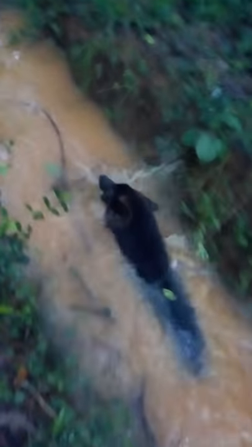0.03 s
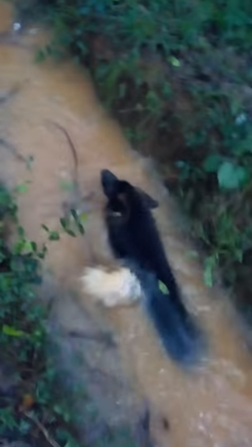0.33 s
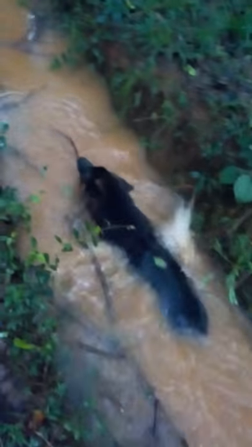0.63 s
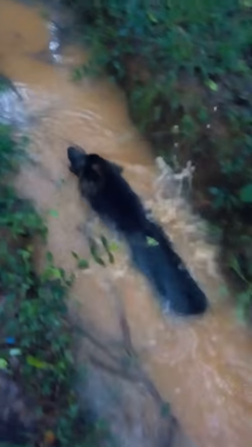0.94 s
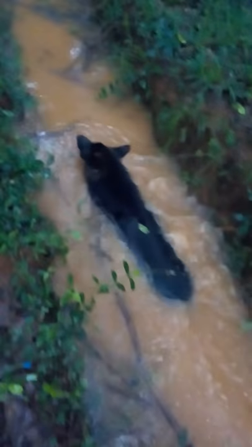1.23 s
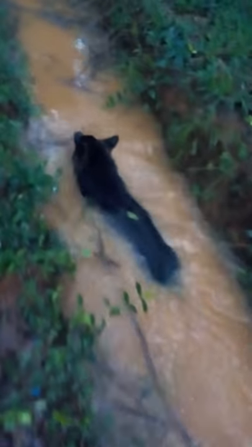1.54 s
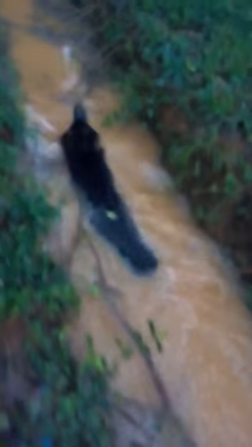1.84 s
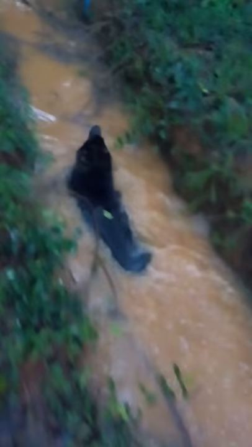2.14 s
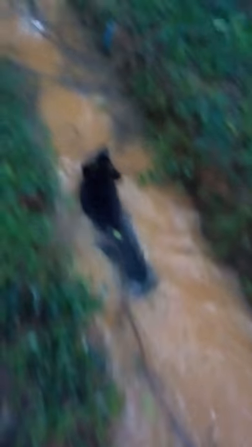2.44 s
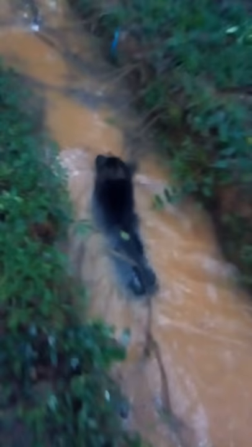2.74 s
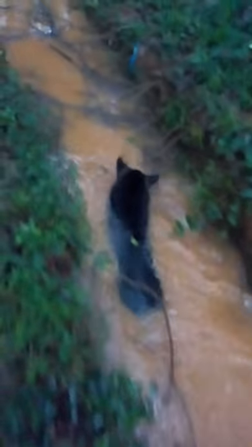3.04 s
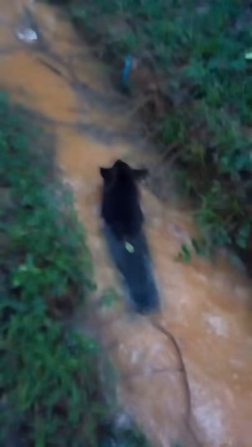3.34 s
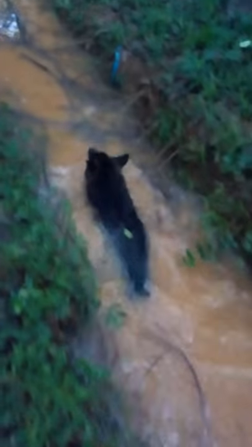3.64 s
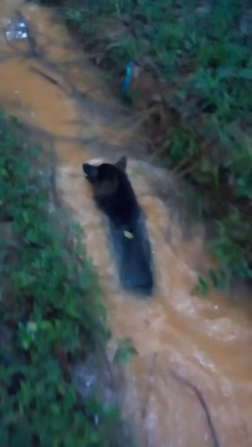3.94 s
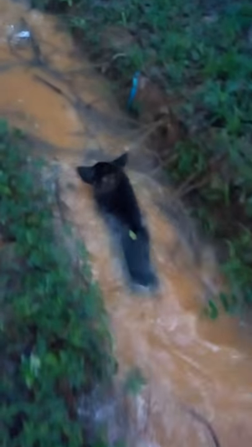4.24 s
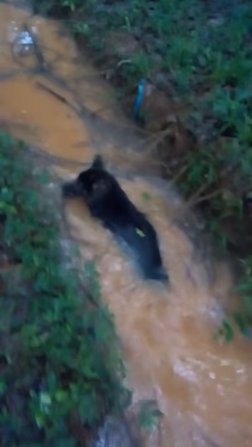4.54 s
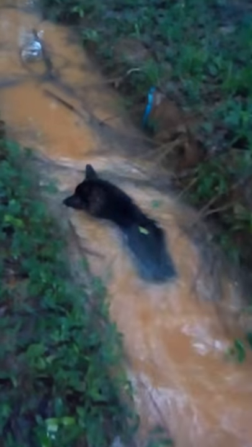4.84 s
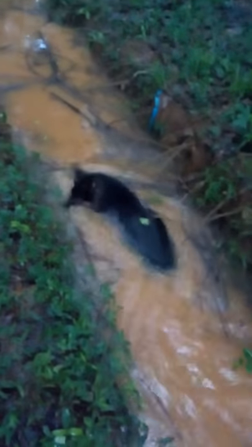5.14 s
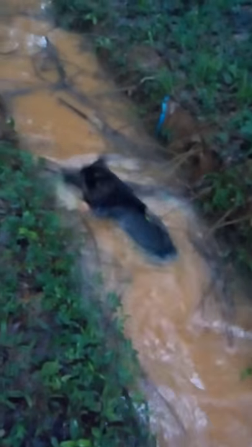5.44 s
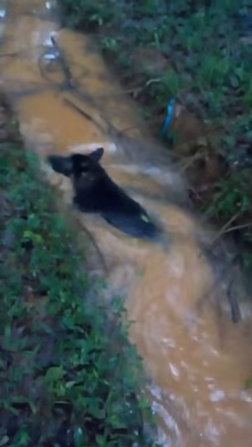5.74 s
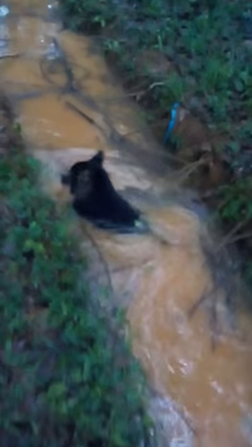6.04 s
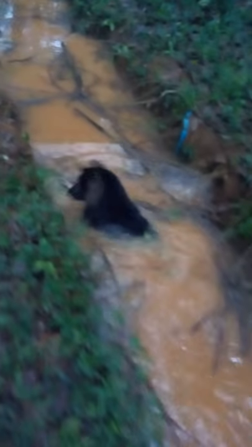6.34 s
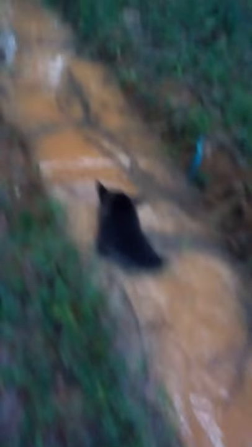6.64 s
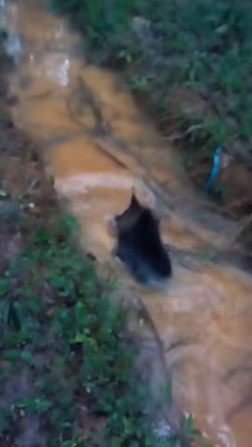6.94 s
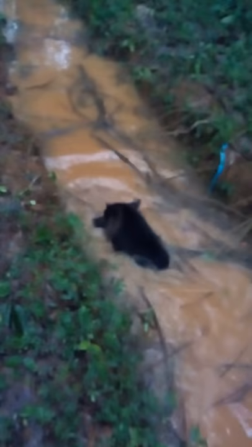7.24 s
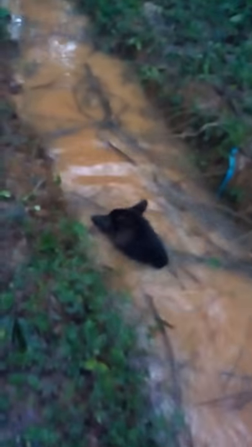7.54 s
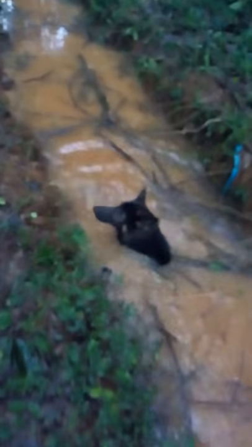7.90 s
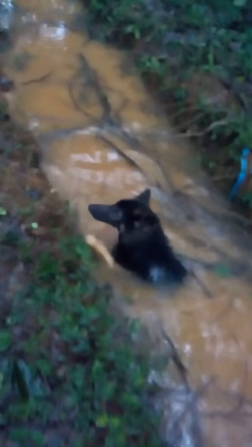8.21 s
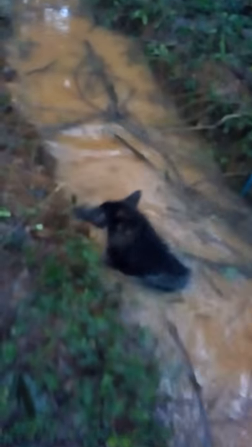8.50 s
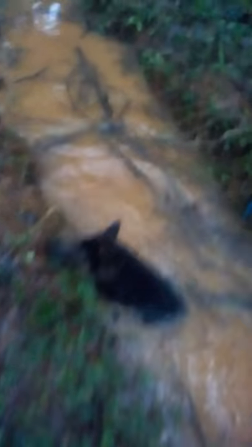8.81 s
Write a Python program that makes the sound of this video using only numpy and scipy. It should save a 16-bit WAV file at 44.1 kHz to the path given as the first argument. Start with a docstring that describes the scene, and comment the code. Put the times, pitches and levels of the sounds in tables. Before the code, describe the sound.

A dog wades up a shallow stream, its legs splashing, plopping and gurgling over the steady rush of the current.

```python
"""A muddy stream, heard from the bank on a hand-held phone: a dog wades and paddles up it.
Over the steady rush of the current its legs throw splashes and drops and drag air under,
which rings as bubbles and closes in sharp plops. The left microphone port is covered:
it booms near 440 Hz, loses the treble and picks up the rubbing and bumps of the hand."""
import sys
import numpy as np
from scipy import signal
from scipy.io import wavfile

SR = 44100
rng = np.random.default_rng(int(sys.argv[2]) if len(sys.argv) > 2 else 0)


def int16_out(signal):
    """Quantize to a 16-bit WAV file."""
    q = np.round(np.clip(np.atleast_2d(signal).T, -1, 1) * 32767)
    wavfile.write(sys.argv[1], SR, q.astype(np.int16))


N = 398134

# source spectra: freq_hz, level_db
CURRENT_SPECTRUM = [(40, -10), (120, -18), (350, -7), (550, 4), (1000, 0), (2500, 1.5), (6400, 4),
                    (8000, -7), (10000, -8), (15000, -22)]
RUB_SPECTRUM = [(40, -2), (80, -1.5), (180, -6.5), (1000, -28.5)]
SPLASH_SPECTRUM = [(300, -12.5), (490, -1), (1000, 2), (2500, 0), (6400, -4), (8000, -14.5), (10000, -14),
                   (15000, -23.5)]
CHURN_SPECTRUM = [(40, -26), (110, -3.5), (300, 4), (650, -22.5)]
TICK_SPECTRUM = [(500, -30), (3000, 0), (6000, 9), (9000, -5), (15000, -24)]
DROP_SPECTRUM = [(500, 8.5), (3000, 2), (6500, 8), (8500, 2.5), (15000, -3)]
PLOP_SPECTRUM = [(40, -40), (100, -13), (250, -1.5), (500, 1), (1000, -2), (5500, -2.5), (12000, -16)]
MIST_SPECTRUM = [(2500, -43), (6400, 7.5), (8000, -1), (10500, -2.5), (15000, -15)]
# covered port response: freq_hz, gain_db
COVERED_PORT = [(60, -2.5), (200, -3.5), (320, 3.5), (440, 13), (510, 6), (620, -9), (800, -11),
                (1200, -23), (2500, -31), (8000, -49), (15000, -28)]
# leg strokes: peak_s, length_s, slosh_db, spray_db, gulp_db
LEG_STROKES = [(0.005, 0.16, -34, -29.5, -46.5), (0.071, 0.037, -34, -51, -41.5),
               (0.313, 0.097, -34.5, -32.5, -48), (0.588, 0.11, -38, -35.5, -48),
               (0.665, 0.048, -33, -32, -60), (0.8, 0.21, -44.5, -43.5, -71),
               (0.942, 0.057, -35.5, -31.5, -59), (1.097, 0.071, -35.5, -32, -51.5),
               (1.904, 0.43, -51.5, -47, -70), (3.073, 0.04, -41.5, -38.5, -48),
               (3.462, 0.011, -48, -28.5, -65), (3.568, 0.12, -41.5, -43, -55.5),
               (3.92, 0.23, -49.5, -47, -62.5), (4.095, 0.032, -33, -43, -63),
               (4.696, 0.048, -45.5, -44.5, -68), (5.293, 0.046, -45, -66, -49.5),
               (5.54, 0.16, -46, -50, -57), (5.859, 0.13, -40, -37.5, -73),
               (6.237, 0.16, -46.5, -41.5, -60), (6.934, 0.056, -46.5, -44, -50),
               (7.287, 0.072, -42, -42, -51.5), (7.583, 0.054, -50, -46.5, -51),
               (7.76, 0.16, -51, -46.5, -53.5), (7.954, 0.064, -34, -34, -54),
               (8.428, 0.11, -45.5, -41, -56.5), (8.554, 0.02, -37, -29.5, -60),
               (8.712, 0.098, -44, -37.5, -77), (8.988, 0.068, -48.5, -43, -58)]
# fingers shifting by the port: peak_s, level_db, thud_db, thud_hz
FINGER_BUMPS = [(0.088, -31, -6, 120), (0.514, -34, 10, 134), (0.897, -36, 5.5, 139),
                (1.308, -38.5, 6, 84.6), (2.03, -35, 1, 140), (2.115, -40.5, 0, 171), (2.216, -43, 0, 200),
                (2.384, -37, 5.5, 200), (3.475, -30, -2, 160), (6.679, -25.5, 6.5, 89),
                (6.896, -29.5, 6.5, 152), (7.221, -33, 4, 151), (8.78, -32.5, 8, 181),
                (8.883, -21.5, -27, 168)]
# drops landing: start_s, level_db, pitch_hz
DROP_HITS = [(0.2781, -27.5, 3200), (0.4534, -22, 4400), (0.5414, -21.5, 5700), (0.8413, -26, 3840),
             (0.9065, -23.5, 2670), (1.0425, -27, 6500), (1.1414, -26, 3080), (1.9605, -22, 7100),
             (2.314, -30.5, 5950), (2.871, -31.5, 7500), (3.1512, -29, 8300), (3.928, -34, 4900),
             (3.972, -39, 5770), (4.0321, -30.5, 3480), (4.2576, -23.5, 2840), (4.695, -30.5, 2430),
             (4.722, -30.5, 2780), (5.169, -36, 6860), (5.341, -35, 4740), (5.3525, -32, 5950),
             (5.434, -32, 4000), (5.4757, -29, 3520), (5.499, -34, 6300), (5.5573, -32.5, 5430),
             (5.577, -34, 4500), (6.008, -30.5, 6300), (6.083, -32, 6900), (6.3263, -29, 5600),
             (6.671, -25.5, 3400), (7.6055, -33, 4290), (7.652, -28.5, 4700), (7.713, -30, 4100),
             (8.5145, -25.5, 4600), (8.682, -24.5, 4600), (8.702, -23.5, 4700), (8.9481, -31.5, 8800)]
# ringing cavities: start_s, length_s, level_db, first_hz, last_hz
CAVITIES = [(0.282, 0.044, -36, 220, 433), (0.309, 0.085, -42, 95, 128), (0.561, 0.12, -44, 447, 456),
            (0.636, 0.11, -41, 106, 343), (1.007, 0.084, -36.5, 3140, 3230),
            (3.797, 0.025, -42, 1430, 1490), (5.252, 0.061, -29, 492, 650), (6.428, 0.079, -39, 476, 665),
            (8.214, 0.062, -42.5, 475, 634)]
# single bubbles: start_s, level_db, pitch_hz
LARGE_BUBBLES = [(0.4, -45, 416), (3.456, -37, 673), (4.587, -36, 4800), (4.667, -31, 2010),
                 (5.051, -43, 1220), (6.134, -36.5, 1670), (6.607, -38.5, 1240), (8.227, -32, 2460),
                 (8.67, -33.5, 1290)]
# air pockets closing: start_s, level_db, tilt_db_per_octave, pitch_hz
AIR_POCKETS = [(0.512, 0.5, 7.5, 1110), (2.617, -15.5, 1, 1090), (2.9978, 0, 5, 710),
               (3.2399, -6, 6.5, 735), (4.1, 2.5, -0.5, 1620), (4.3255, 2.5, 2.5, 870),
               (5.1397, -6.5, -1, 900), (5.2197, -2, 0, 1500), (5.2465, -9.5, 3, 780), (5.628, -11, 4, 624),
               (5.649, -13.5, 4.5, 910), (6.8799, -5.5, 6, 850), (7.1605, -3.5, 3, 845),
               (8.4743, -1, 7, 666)]
# water sheets landing: peak_s, level_db, half_length_s
WATER_SHEETS = [(.5225, -27, .002), (.903, -27, .003), (1.142, -29, .003), (3.459, -26, .0045),
                (4.697, -31, .002), (5.931, -30, .028), (7.993, -20.5, .005)]
# runs of like-sized bubbles: peak_s, half_length_s, level_db, centre_hz
BUBBLE_RUNS = [(0.938, 0.011, -31, 2080), (1.055, 0.028, -38, 613), (1.688, 0.05, -42, 627),
               (2.227, 0.0087, -40, 1125), (3.095, 0.021, -39.5, 262), (3.535, 0.022, -38.5, 2350),
               (4.073, 0.026, -39, 1570), (5.343, 0.02, -40.5, 1380), (7.283, 0.013, -30, 653),
               (7.385, 0.018, -38, 1020), (7.603, 0.014, -37, 728), (7.775, 0.0237, -49, 167.9),
               (7.96, 0.034, -38.5, 632), (8.406, 0.016, -33, 1264)]
# mist falling: peak_s, half_length_s, level_db
MIST_FALLS = [(1.078, 0.08, -39.5), (3.942, 0.095, -46.5)]

SLOSH, SPRAY, GULP = 2, 3, 4  # LEG_STROKES columns
WAKE_DB = {SLOSH: -55.5, SPRAY: -52, GULP: -72}  # floor between strokes


def amp(db):
    """Decibels to gain."""
    return 10 ** (np.asarray(db) / 20)


def unit(x):
    """Scale to rms 1."""
    return x / np.sqrt(np.mean(x ** 2) + 1e-20)


def spectrum_db(spectrum, hz):
    """Interpolate a spectrum over log frequency."""
    freq_hz, level_db = np.transpose(spectrum)
    return np.interp(np.log(hz + 1), np.log(freq_hz + 1), level_db)


def add(mix, start_s, sound):
    """Mix a sound in at start_s."""
    part = mix[max(round(start_s * SR), 0):][:len(sound)]
    part += sound[:len(part)]


def response(spectrum, tilt_db_per_octave=0.):
    """Minimum-phase impulse response, tilted above 1 kHz."""
    hz = np.fft.rfftfreq(4096, 1 / SR)
    octaves = np.log2(np.maximum(hz, 1000) / 1000)
    log_gain = np.log(amp(spectrum_db(spectrum, hz) + tilt_db_per_octave * octaves))
    mirrored = np.concatenate([log_gain, log_gain[-2:0:-1]])
    return np.fft.ifft(np.exp(np.conj(signal.hilbert(mirrored)))).real


def colour(x, spectrum):
    """Filter by a spectrum table."""
    return signal.oaconvolve(x, response(spectrum))[:N]


def flutter(rate_hz):
    """Smooth random curve, rms 1."""
    return unit(np.interp(np.arange(N) * rate_hz / SR, np.arange(N), rng.standard_normal(N)))


def burst(peak_s, half_s):
    """Gaussian envelope, peak 1."""
    t = np.arange(N) / SR
    return np.exp(-np.minimum(((t - peak_s) / half_s) ** 2, 20))


def patter(per_s, spread_db):
    """Clicks of random sign and size; per_s may be a curve."""
    chance, size, side = rng.random((3, N))
    gain = amp(spread_db * np.minimum(-np.log(1 - size), 3))
    return (chance < per_s / SR) * np.sign(side - .5) * gain


def bubble(hz, decay_cycles, onset_cycles, glide):
    """A bubble's damped ring; glide raises the pitch as it surfaces."""
    cycles = np.arange(int(6 * decay_cycles * SR / hz) + 8) * hz / SR
    envelope = (1 - np.exp(-(cycles / onset_cycles) ** 2)) * np.exp(-cycles / decay_cycles)
    phase = 2 * np.pi * cycles * (1 + glide * cycles / decay_cycles / 2)
    return envelope / envelope.max() * np.sin(phase)


def froth(lo_hz, hi_hz, per_s, spread_db, cycles_at_1khz, wash, bands=36):
    """A crowd of bubbles, mostly small, over a noise wash of those too many to tell apart."""
    pitches_hz, out = np.geomspace(lo_hz, hi_hz, bands), np.zeros(N)
    for hz in pitches_hz:
        count = int(per_s * N / SR * hz / pitches_hz.sum())
        when, size, side = rng.random((3, 4096))[:, :count]
        gain = amp(spread_db * np.minimum(-np.log(1 - size), 4))
        births = np.bincount((when * N).astype(int), gain * np.sign(side - .5), N)
        decay_cycles = cycles_at_1khz * np.cbrt(hz / 1000) * rng.uniform(.5, 1.5)
        ring = bubble(hz, decay_cycles, onset_cycles=.6, glide=.01)
        out += signal.oaconvolve(births, ring / np.linalg.norm(ring))[:N]
    return unit(unit(out) + wash * rng.standard_normal(N))


def stroke_db(column, lag_s=0.):
    """Level of one part of the strokes: each swells and settles over the steady wake."""
    t, power = np.arange(0, N, 64) / SR, amp(WAKE_DB[column]) ** 2
    for row in LEG_STROKES:
        peak_s, length_s = row[:2]
        age = (t - peak_s - lag_s) / length_s
        envelope = np.exp(-np.where(age < 0, (age / 1.34) ** 2, abs(age) ** .88))
        power = power + (amp(row[column]) * envelope) ** 2
    return np.interp(np.arange(N) / SR, t, 10 * np.log10(power))


def current():
    """Steady fizz of tiny bubbles, different at each port."""
    fizz = froth(384, 14200, per_s=1400, spread_db=5, cycles_at_1khz=4.9, wash=3.8, bands=24)
    near = unit(colour(fizz, CURRENT_SPECTRUM))
    far = unit(colour(rng.standard_normal(N), CURRENT_SPECTRUM))
    return np.array([unit(near + 2 * far), near]) * amp(-48.5 + .5 * flutter(21))


def rubbing(regrip_s=6.67, fade_s=1.4, spread_s=.067):
    """The hand rubs the case: a lumpy rumble, louder around each bump and after a change of grip."""
    t = np.arange(N) / SR
    shifts = sum(amp(db - 27.5) * np.exp(-abs(t - peak_s) / spread_s) for peak_s, db, *_ in FINGER_BUMPS)
    grip = amp(-63 + 16 * (t > regrip_s) * np.exp(-abs(t - regrip_s) / fade_s))
    rumble = unit(colour(rng.standard_normal(N), RUB_SPECTRUM))
    return rumble * np.hypot(grip, shifts) * amp(4.5 * flutter(25))


def splashes(split_hz=2500):
    """Gentle strokes stir separate bubbles; hard ones merge into a dense wash and fine spray."""
    slosh_db = stroke_db(SLOSH)
    foam = froth(420, 11000, per_s=1400, spread_db=3.3, cycles_at_1khz=4.6, wash=.55)
    density = np.minimum(amp(slosh_db + 32), .75)
    blend = np.sqrt(1 - density) * foam + np.sqrt(density) * rng.standard_normal(N)
    water = colour(blend, SPLASH_SPECTRUM)
    slosh = signal.sosfiltfilt(signal.butter(3, split_hz, fs=SR, output="sos"), water)
    spray = unit(water - slosh) * amp(stroke_db(SPRAY) - 1.56)
    clumps_db = 1.6 * flutter(130) + 1.1 * flutter(30)
    return (unit(slosh) * amp(slosh_db) + spray) * amp(clumps_db)


def churn():
    """Large slow bubbles gulp around the legs."""
    gulps = froth(99.7, 454, per_s=150, spread_db=1, cycles_at_1khz=3.8, wash=.46, bands=12)
    return unit(colour(gulps, CHURN_SPECTRUM)) * amp(stroke_db(GULP, lag_s=.0015) + 2.5)


def spatter():
    """Stray droplets tick on the surface in clusters, following the spray."""
    activity = np.minimum(amp(stroke_db(SPRAY) + 46), 1.3)
    clusters = np.minimum(2 * np.maximum(flutter(20), 0) ** 2, 4)
    return amp(-23) * colour(patter(per_s=34 * activity * clusters, spread_db=2), TICK_SPECTRUM)


def finger_bumps(push_s=.0014, decay_s=.019):
    """A finger pushes on the case, which answers with a low thud."""
    out, t = np.zeros(N), np.arange(-400, 4000) / SR
    age_s, push_time = np.maximum(t, 0), t / push_s
    push = (1 - 2 * push_time ** 2) * np.exp(-push_time ** 2)
    for peak_s, level_db, thud_db, thud_hz in FINGER_BUMPS:
        thud = np.sin(2 * np.pi * thud_hz * age_s) * np.exp(-age_s / decay_s)
        add(out, peak_s + t[0], -amp(level_db + 8) * (push + amp(thud_db - 12) * thud))
    return out


def drops():
    """A drop lands with a tick, a brief ring and a faint tail of fizz."""
    out, t = np.zeros(N), np.arange(1024) / SR
    tone_filter = response(DROP_SPECTRUM)[:256]
    for start_s, level_db, pitch_hz in DROP_HITS:
        impact = rng.standard_normal(len(t)) * (np.exp(-t / .0007) + .1 * np.exp(-t / .004))
        ring = bubble(pitch_hz, decay_cycles=.8, onset_cycles=.4, glide=0)
        tick = np.convolve(np.convolve(impact, ring), tone_filter)
        add(out, start_s, amp(level_db + 8) * tick / abs(tick).max())
    return out


def glugs():
    """A cavity behind a paw rings unevenly; its pitch slides as its size changes."""
    out, wobble = np.zeros(N), 1 + .018 * flutter(150)
    for start_s, length_s, level_db, first_hz, last_hz in CAVITIES:
        progress = np.arange(int(length_s * SR)) / (length_s * SR)
        slide_hz = first_hz * (last_hz / first_hz) ** progress
        pitch_hz = slide_hz * wobble[round(start_s * SR):][:len(progress)]
        envelope = np.sin(np.pi * progress ** .73) ** 2  # peaks early
        add(out, start_s, amp(level_db) * envelope * np.sin(2 * np.pi * np.cumsum(pitch_hz) / SR))
    return out * amp(3.5 * flutter(220))


def large_bubbles():
    """Single bubbles ring out of the wash."""
    out = np.zeros(N)
    for start_s, level_db, pitch_hz in LARGE_BUBBLES:
        ring = bubble(pitch_hz, decay_cycles=6.5, onset_cycles=.31, glide=.042)
        add(out, start_s, amp(level_db + 7.5) * ring)
    return out


def plops(q=1.2):
    """An air pocket closes behind a paw: a sharp dip and hollow rebound, dull above its own pitch."""
    out, freq_hz = np.zeros(N), np.geomspace(20, 20000, 120)
    for start_s, level_db, tilt_db_per_octave, pitch_hz in AIR_POCKETS:
        ratio = freq_hz / pitch_hz
        hollow_db = -10 * np.log10((1 - ratio ** 2) ** 2 + (ratio / q) ** 2)
        spectrum = np.column_stack([freq_hz, spectrum_db(PLOP_SPECTRUM, freq_hz) + hollow_db])
        pulse = response(spectrum, tilt_db_per_octave) / np.linalg.norm(response(spectrum))
        add(out, start_s, -amp(level_db + 4) * pulse)
    return out


def slaps():
    """A thrown sheet of water lands in a short burst of noise."""
    landing = sum(amp(db) * burst(peak_s, half_s) for peak_s, db, half_s in WATER_SHEETS)
    return landing * unit(colour(rng.standard_normal(N), SPLASH_SPECTRUM))


def gurgles(per_s=200, spread_octaves=.514, decay_cycles=4.97):
    """Air dragged under by a leg comes up as a quick run of bubbles around one pitch."""
    out = np.zeros(N)
    for peak_s, half_s, level_db, centre_hz in BUBBLE_RUNS:
        run, count = np.zeros(N), 2 + int(2 * half_s * per_s)
        for when, detune, size in rng.uniform(-1, 1, (128, 3))[:count]:
            pitch_hz = centre_hz * 2 ** (spread_octaves * detune * abs(detune))
            ring = bubble(pitch_hz, decay_cycles, onset_cycles=.81, glide=0)
            start_s = peak_s + half_s * when - decay_cycles / centre_hz / 2
            add(run, start_s, np.exp(size / 2 - when ** 2) * ring)
        out += amp(level_db) * run * np.sqrt(half_s * SR / np.sum(run ** 2))
    return out


def mist():
    """The finest droplets fall back as a bright sparkle."""
    falling = sum(amp(db) * burst(peak_s, half_s) for peak_s, half_s, db in MIST_FALLS)
    return falling * unit(colour(patter(per_s=4000, spread_db=7), MIST_SPECTRUM))


def banks(x, t60_s=.032, wet_db=-9):
    """Close, overgrown banks add a short, faint scatter with little bass."""
    t = np.arange(8192) / SR
    scatter = rng.standard_normal(len(t)) * amp(-60 * t / t60_s) * (t > .001)
    scatter = signal.sosfilt(signal.butter(2, 800, "highpass", fs=SR, output="sos"), scatter)
    return x + amp(wet_db) * signal.oaconvolve(x, scatter / np.linalg.norm(scatter))[:N]


def scene():
    """Water at both ports, its crisp sounds scattered by the banks; the hand at the left only."""
    water = current() + splashes() + slaps() + churn() + gurgles() + glugs() + mist()
    crisp = plops() + large_bubbles() + drops() + spatter()
    left, right = [port + banks(crisp) for port in water]
    return np.array([left + finger_bumps() + rubbing(), right])


def record(dry, low_cut_hz=55, high_cut_hz=15700):
    """The covered left port delays, muffles and booms over faint hiss; both sides are band-limited."""
    covered = np.pad(colour(dry[0], COVERED_PORT), (8, 0))[:N]
    hiss = amp(-76.5) * unit(colour(rng.standard_normal(N), CURRENT_SPECTRUM))
    low_cut = signal.butter(2, low_cut_hz, "highpass", fs=SR, output="sos")
    high_cut = signal.firwin(255, high_cut_hz, window=("kaiser", 9), fs=SR)
    ports = signal.sosfilt(low_cut, np.array([covered + hiss, dry[1]]))
    return signal.oaconvolve(ports, high_cut[None], "same")


dry = scene()
out = record(dry)
int16_out(out)
```